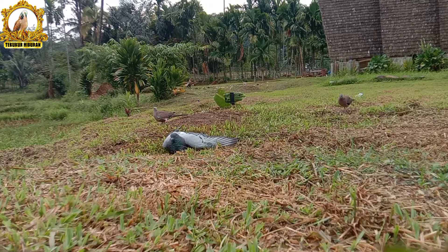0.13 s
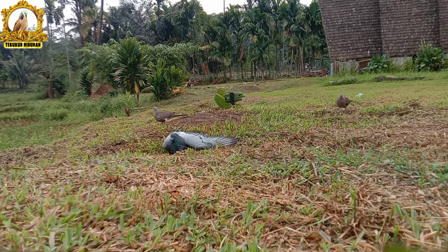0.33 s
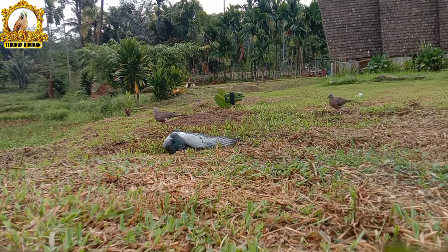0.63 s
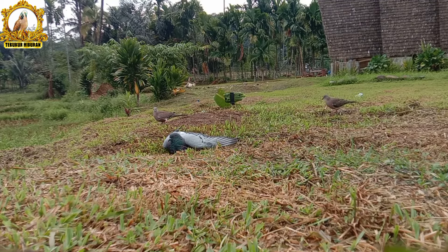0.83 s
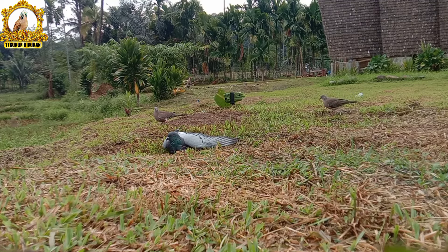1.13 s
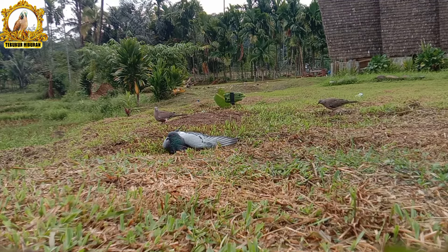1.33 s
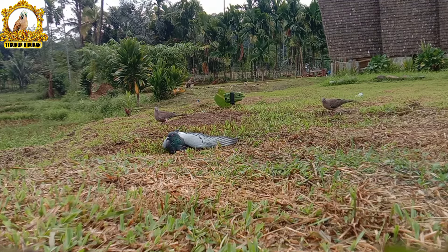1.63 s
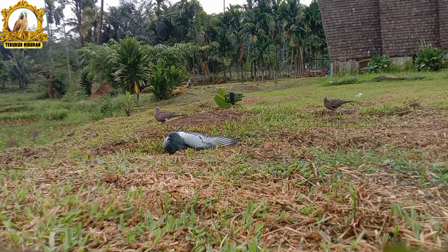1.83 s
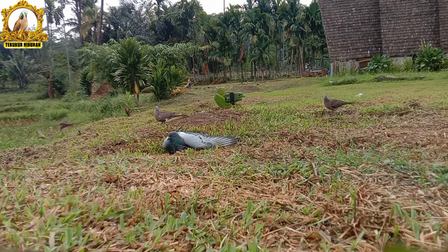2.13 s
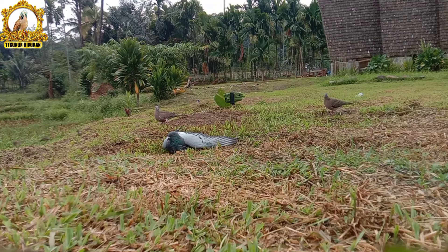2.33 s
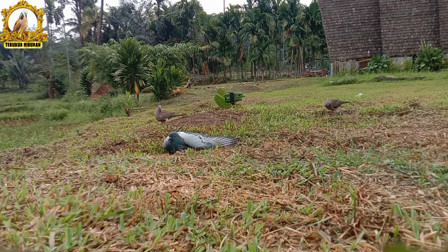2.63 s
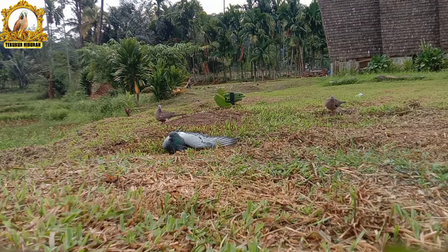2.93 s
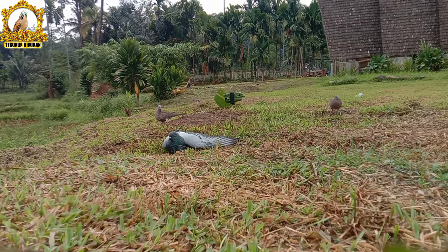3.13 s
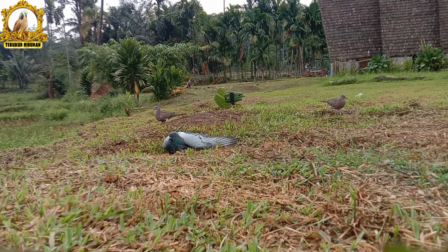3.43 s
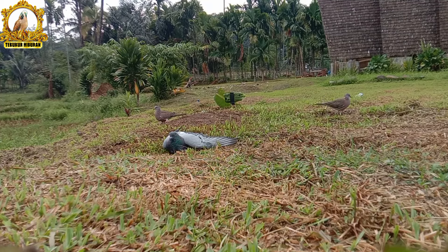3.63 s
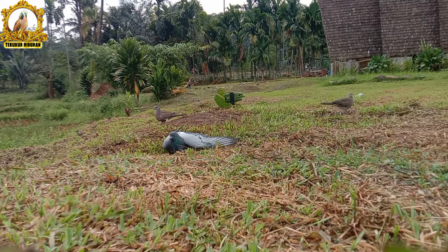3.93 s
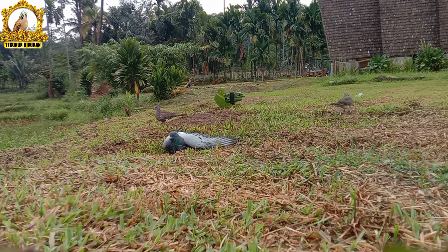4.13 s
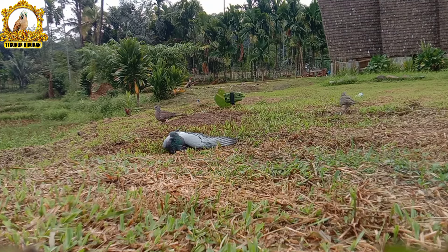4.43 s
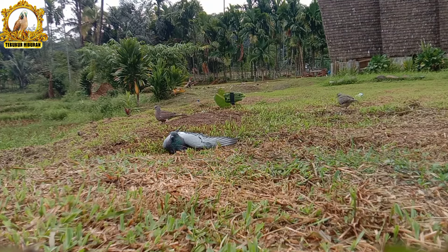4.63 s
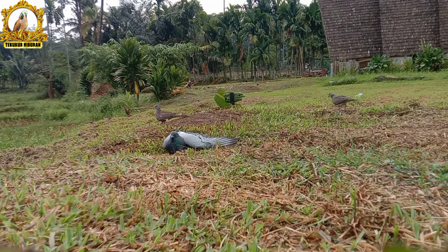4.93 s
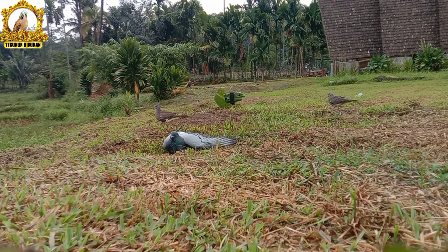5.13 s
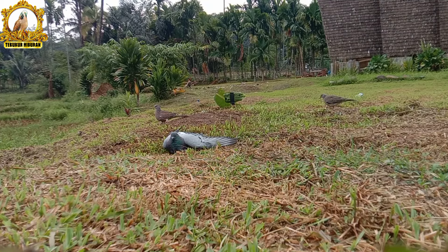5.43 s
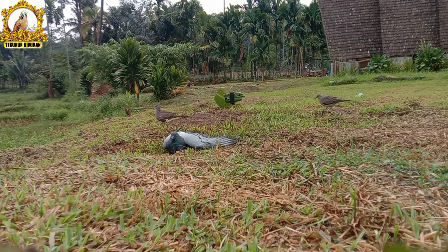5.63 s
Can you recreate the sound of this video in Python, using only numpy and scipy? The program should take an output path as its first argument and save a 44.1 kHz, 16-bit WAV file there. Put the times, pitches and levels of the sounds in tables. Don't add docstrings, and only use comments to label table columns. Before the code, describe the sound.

A quiet outdoor village yard, captured by a phone microphone near birds on the grass. A very short, bright sparrow chirrup strikes at 0 s, the loudest close sound. At about 0.5 s overlapping sparrows answer with a squabbling cluster and a tiny rising squeal; a weaker chirp follows near 1.2 s and another quick burst at 1.65 s. From 1.9 to 3.55 s a rooster across the yard crows once: two rough opening syllables, a long strained cry from 2.4 s, then a breaking, stuttering fall. Soft low wing thumps come irregularly, clearer from 2 to 4.4 s and bunched from 5.25 to 5.8 s. Small distant sparrow chirps continue throughout. A faint steady whistle appears around 3.2 s, and far fowl moan and cluck after 4.8 s. Underneath are breeze with low rumble, swelling near 3.5 s and at the end, faint insects, motor hum, distant flock chatter and short natural echoes.

```python
import sys
import numpy as np
from scipy import signal
from scipy.fft import rfft, irfft
from scipy.io import wavfile
from scipy.ndimage import uniform_filter1d

SR = 44100
rng = np.random.default_rng(int(sys.argv[2]) if len(sys.argv) > 2 else 0)


def linear_from_db(decibels):
    return 10 ** (np.asarray(decibels, float) / 20)


def master(y):
    cut = np.clip(np.atleast_2d(y).T, -1, 1)
    pcm = np.round(cut * 32767)
    wavfile.write(sys.argv[1], SR, pcm.astype(np.int16))


N = 255780

# (time of the flick [s], flick [dB], lead-in [dB],
# tail [dB], pitch share)
CHIRRUPS = [
    (-.008, -13, -61, -37, 0.94),
    (0.5368, -24, -38, -45, 0.97),
    (0.538, -25.5, -66, -60, 0.98),
    (1.171, -30, -38.5, -43.5, 0.96),
]
CLEAR_BLUR_HZ, TAIL_BLUR_HZ, HOARSE_BLUR_HZ, STROKE_BLUR_HZ = 46, 138, 600, 111


def rms_one(x):
    return x / np.sqrt(np.mean(np.abs(x) ** 2) + 1e-20)


def in_time(rows):
    s, *columns = np.transpose(rows)
    return [np.interp(np.arange(N) / SR, s, column) for column in columns]


def drift(rate_hz, size=N):
    r = np.exp(-2 * np.pi * rate_hz / SR)
    run_in = int(SR / rate_hz)
    noise = rng.standard_normal(size + run_in)
    return rms_one(signal.lfilter([1], [1, -2 * r, r * r], noise)[run_in:])


def resonance(x, hz, width_hz):
    r = np.exp(-np.pi * width_hz / SR)
    b = (1 - r * r) / 2 * np.array([1, 0, -1])
    a = [1, -2 * r * np.cos(2 * np.pi * hz / SR), r * r]
    return signal.lfilter(b, a, signal.lfilter(b, a, x))


def swaying(hz, spread_hz):
    sway = drift(spread_hz) + 1j * drift(spread_hz)
    return rms_one(np.real(sway * np.exp(2j * np.pi * np.cumsum(hz) / SR)))


def whistled(rows, flat, steady_hz):
    out = np.zeros(N + SR)
    for s, length, start_hz, end_hz, peak_db, blur_hz in rows:
        at, size = max(round(s * SR), 0), round(length * SR)
        u = np.arange(size) / size
        phase = 2 * np.pi * np.cumsum(start_hz + (end_hz - start_hz) * u) / SR
        blur_hz = max(blur_hz, 2)
        wander = drift(blur_hz, size) + 1j * drift(blur_hz, size)
        wander = rms_one(steady_hz / blur_hz + wander)
        swell = np.sin(np.pi * u) ** flat
        out[at:at + size] += linear_from_db(peak_db) * swell * np.real(np.exp(1j * phase) * wander)
    return out[:N]


def near_birds():
    # (time [s], length [s], start [Hz], end [Hz], peak [dB])
    squabble = [(.001, 0.013, 1554, 1190, -39.5), (0.009, 0.013, 3600, 4000, -32.5),
                (0.016, 0.011, 3740, 3530, -36), (.003, .009, 5150, 4800, -34),
                (.005, 0.01, 6150, 6100, -46), (0.02, .01, 6300, 6250, -51),
                (0.522, 0.022, 4600, 4450, -31.5), (0.556, .008, 3430, 3880, -33),
                (0.56, 0.011, 3900, 3600, -32.5), (0.523, 0.025, 5060, 4710, -25.5),
                (0.471, 0.0086, 5380, 5400, -49), (0.511, 0.013, 6270, 6050, -42.5),
                (.558, 0.013, 7600, 7220, -47), (0.55, 0.018, 2814, 2660, -34),
                (0.567, 0.0093, 2830, 2700, -40), (0.571, 0.0072, 6400, 6170, -47),
                (1.638, 0.0067, 6070, 5800, -50), (1.64, .007, 3600, 4050, -41.5),
                (1.643, 0.011, 5000, 4350, -47), (1.657, 0.0083, 4220, 4170, -43),
                (1.671, 0.0053, 3600, 3750, -39), (1.674, 0.005, 5080, 5030, -43),
                (1.686, 0.008, 3580, 3510, -39), (1.663, 0.0039, 4710, 5360, -26),
                (1.667, 0.0041, 5040, 4770, -31), (1.68, 0.0063, 3500, 3680, -30.5)]
    # (time [s], length [s], start [Hz], end [Hz], peak [dB])
    hoarse = [
        (0.0011, 0.044, 3600, 3380, -39),
        (.493, 0.0765, 4900, 5300, -41.5),
        (0.54, 0.0053, 5800, 4700, -37),
        (0.51, .065, 4906, 3770, -36.5),
    ]
    # (time [s], length [s], start [Hz], end [Hz], peak [dB])
    paired = [(1.692, .014, 3570, 3700, -40), (0.1, .008, 4980, 4800, -42), (0.106, 0.044, 3700, 3530, -49),
              (4.295, 0.021, 5360, 5000, -48), (4.947, 0.014, 4730, 5300, -50),
              (4.964, 0.024, 3690, 3600, -51), (2.491, 0.028, 5220, 4774, -44),
              (2.51, 0.027, 3600, 3500, -46), (3.3, 0.026, 5400, 5500, -46),
              (3.309, 0.023, 3810, 4040, -45), (3.596, 0.029, 5000, 5010, -44.5),
              (3.603, 0.026, 4500, 4390, -46.5), (3.613, 0.039, 3700, 3330, -42.5)]
    # (time after the flick [s], length [s], start [Hz], end [Hz])
    tail = (0.015, 0.0215, 3780, 3520)
    # (time [s], length [s], start [Hz], end [Hz])
    squeal = (.526, 0.038, 1012, 1700)
    # (multiple, level [dB], share of the squeal it lasts)
    squeal_orders = [(2, -37, 0.99), (3, -46, 0.51)]
    rows = [(*row, CLEAR_BLUR_HZ) for row in squabble]
    rows += [(*row, HOARSE_BLUR_HZ) for row in hoarse]
    rows += [(*row, TAIL_BLUR_HZ) for row in paired]
    rows += [(s + tail[0], *tail[1:], tail_db, TAIL_BLUR_HZ) for s, _, _, tail_db, _ in CHIRRUPS]
    s, length, start_hz, end_hz = squeal
    for k, db, part in squeal_orders:
        stop_hz = start_hz + part * (end_hz - start_hz)
        rows.append((s, part * length, k * start_hz, k * stop_hz, db, CLEAR_BLUR_HZ))
    return chirrups() + whistled(rows, flat=.9, steady_hz=200)


def chirrups():
    # (time from the flick [s], pitch [Hz], level [dB], share of the flick's own strength)
    glide = [
        (-.019, 4470, -23, 0),
        (-.015, 4600, -0.5, 0.13),
        (-.002, 4330, -8, 0.071),
        (.002, 4668, -3, 1),
        (.0045, 5396, -2.5, 1),
        (.007, 5276, 0, 1),
        (0.012, 4550, -3.5, 0.57),
        (0.016, 4300, -25, 1),
    ]
    out = np.zeros(N + SR)
    lag, hz, db, flick = np.transpose(glide)
    t = np.arange(lag[0], lag[-1], 1 / SR)
    for s, flick_db, lead_db, _, share in CHIRRUPS:
        shape_db = db + lead_db + np.clip(flick, 0, 1) * (flick_db - lead_db)
        level_db = np.interp(t, lag, shape_db) + 1.5 * drift(160, len(t))
        voice = linear_from_db(level_db) * np.sin(2 * np.pi * np.cumsum(share * np.interp(t, lag, hz)) / SR)
        out[SR // 2 + round((s + lag[0]) * SR):][:len(t)] += voice
    return out[SR // 2:][:N]


def leafy_strokes():
    # (time [s], length [s], start [Hz], end [Hz], peak [dB])
    strokes = [(0.526, .02, 2920, 3800, -45), (0.549, 0.035, 3290, 3000, -42),
               (0.574, .008, 3500, 4000, -42), (0.545, .011, 5150, 4900, -29),
               (0.596, 0.011, 3370, 3800, -51), (1.628, .007, 5650, 5700, -52),
               (1.634, 0.0074, 4950, 5000, -50), (1.648, .015, 5600, 5400, -50),
               (1.665, 0.0087, 4170, 3960, -40), (1.682, .03, 4700, 4750, -52),
               (1.685, 0.026, 5500, 5270, -55), (1.686, 0.0067, 3400, 3570, -35.5),
               (1.715, 0.014, 3520, 3600, -59), (4.875, .03, 3890, 3930, -56),
               (4.876, 0.022, 3990, 4740, -59), (4.879, 0.027, 3170, 3080, -60),
               (4.961, .014, 5600, 5500, -58), (4.977, .035, 4420, 4340, -58.5),
               (5.029, 0.022, 4900, 4900, -58), (5.045, 0.022, 3760, 3600, -57),
               (0.235, 0.032, 4900, 5050, -58.5), (0.269, 0.027, 4230, 4450, -61),
               (.1, .025, 4450, 4350, -54), (0.112, .008, 3660, 3640, -47), (0.622, 0.077, 5440, 5500, -61),
               (0.678, 0.044, 3300, 3520, -58)]
    return whistled([(*row, STROKE_BLUR_HZ) for row in strokes], flat=0.68, steady_hz=130)


def accents_and_overtones():
    # (time [s], length [s], start
    # [Hz], end [Hz], peak [dB])
    accents = [(3.076, .05, 6100, 6110, -56.5), (3.085, .055, 4550, 4480, -55),
               (3.135, 0.02, 5600, 5545, -56), (3.24, .05, 3880, 3820, -55), (3.44, 0.024, 5900, 5796, -55),
               (3.456, 0.023, 4430, 4430, -55), (3.485, .035, 3800, 3750, -57),
               (1.365, .017, 4450, 4350, -55), (1.488, .045, 5050, 4750, -53),
               (1.255, 0.052, 3700, 3800, -61), (3.815, 0.021, 5450, 5530, -52),
               (3.954, 0.02, 4480, 4520, -59), (4.538, .04, 5000, 5020, -65),
               (4.213, .035, 4900, 4900, -60), (4.315, 0.027, 4500, 4420, -56),
               (5.343, 0.048, 3000, 3070, -59)]
    # (time [s], length [s], start [Hz], end [Hz], peak [dB])
    overtones = [
        (.518, .034, 14500, 14930, -56),
        (.519, .024, 13200, 13000, -61),
        (.52, .024, 10060, 9700, -62),
        (0.541, .009, 10650, 10600, -52),
    ]
    rows = [(*row, STROKE_BLUR_HZ / 2) for row in accents]
    rows += [(*row, HOARSE_BLUR_HZ) for row in overtones]
    return whistled(rows, flat=0.56, steady_hz=100)


def crow():
    # (time [s], effort [dB], flapping rate [Hz], chaos [dB], beak opening [dB])
    syllables = [
        [(1.918, -56, 640, 1, -9), (1.971, -49, 680, -7, -13), (2.008, -51.5, 646.3, 10.5, -4.5),
         (2.06, -46.5, 629, 5, -11), (2.11, -53.5, 622, 2, -7), (2.181, -53.5, 640, -8, -3)],
        [(2.188, -54.5, 660, 15.5, -4), (2.23, -56, 670, 6.5, 0.5), (2.3, -56.5, 661, 0, 8),
         (2.33, -52, 661.5, 14.5, 2), (2.364, -53.5, 654.4, 4.5, -3)],
        [(2.41, -46, 669, 9, -8), (2.45, -54, 657, 0.5, 3), (2.56, -42.5, 649, 4, -3.5),
         (2.73, -46, 606.4, -2, -10.5), (2.8, -44, 645.2, 2.5, -9.5), (3.03, -49, 636.6, 9.5, -8.5),
         (3.1, -58.5, 647.2, 12.5, 1), (3.2, -57, 637, 4, -4)],
        [(3.27, -50.5, 654, -0.5, -8), (3.4, -49.5, 664, -7.5, -11.5), (3.5, -52, 665, -11, -10),
         (3.55, -59, 668, -6, 0)],
    ]
    # (time [s], pitch [Hz])
    chest = [
        (1.9, 570),
        (1.97, 630),
        (2.1, 580),
        (2.22, 640),
        (2.35, 600),
        (2.47, 700),
        (2.68, 690),
        (3.0, 565),
        (3.55, 525),
    ]
    rows = [row for part in syllables for row in part]
    onset = (rows[0][0] - .008, -85, *rows[0][2:])
    silence = (4.5, -99, 665.0, -31, 7)
    effort_db, flap_hz, chaos_db, open_db = in_time([onset, *rows, silence])
    late = np.arange(N) / SR - 3.285
    stutter_db = 6 * np.sin(2 * np.pi * 15.93 * late) * ((late > 0) & (late < .25))
    beak_db = effort_db + open_db
    upper_hz, first_db, second_db = upper_voice()
    throat_db = effort_db + chaos_db + stutter_db
    rasp = crow_rasp(second_db, throat_db, flap_hz, effort_db + stutter_db, in_time(chest)[0], beak_db)
    return rasp + crow_voices(upper_hz, first_db, second_db, beak_db)


def crow_voices(upper_hz, first_db, second_db, beak_db):
    # (multiple, level under the second [dB])
    upper_orders = [(3, -7), (7, -18.5), (8, -22.5)]
    # (multiple of upper voice, multiple of lower voice, level [dB])
    sum_tones = [(1, 1, 1.5), (1, 2, -0.5), (2, 1, -1)]
    # (from [s], to [s])
    locked = [
        (2.262, 2.325),
        (2.455, 2.52),
    ]
    # (from [s], to [s], times the usual wobble)
    frayed = (2.53, 2.73, 4.95)
    lower_hz, lower_db, sum_db = lower_voice()
    t = np.arange(N) / SR
    loose = np.where(np.any([(t > a) & (t < b) for a, b in locked], axis=0), .2, 1)
    fray = np.where((t > frayed[0]) & (t < frayed[1]), frayed[2], 1)
    upper = 2 * np.pi * np.cumsum(upper_hz * (1 + 0.00627 * fray * drift(43.0))) / SR
    lower = 2 * np.pi * np.cumsum(lower_hz * (1 + 0.03684 * loose * drift(50.4))) / SR
    out = linear_from_db(first_db) * np.sin(upper) + linear_from_db(second_db) * np.sin(2 * upper)
    out += linear_from_db(lower_db) * np.sin(lower)
    for k, db in upper_orders:
        if k == 3:
            passed_db, wander = -np.clip((upper_hz - 750) / 4.6, 0, 12), 0
        else:
            passed_db, wander = np.clip(beak_db + 62.0, -15, 0), 0.9 * drift(89)
        out += linear_from_db(second_db + db + passed_db + 2.6 * drift(29.4)) * np.sin(k * upper + wander)
    for k, m, db in sum_tones:
        out += linear_from_db(second_db + sum_db + db + 2.5 * drift(31)) * np.sin(k * upper + m * lower)
    out += linear_from_db(second_db + sum_db + beak_db + 49.0) * np.sin(3 * upper + lower)
    return np.sqrt(2) * out * linear_from_db(-1.0 + 0.69 * drift(46.4))


def upper_voice():
    # (time [s], length [s], top pitch [Hz], first partial [dB], second partial [dB])
    sung = [
        (1.921, 0.1, 768, -49.5, -42.5),
        (2.016, 0.072, 788, -51.5, -48),
        (2.203, .12, 813, -40, -42),
        (2.332, .06, 810.5, -47, -70),
        (2.41, 0.32, 804, -41.5, -44.5),
        (2.94, 0.2, 798, -42, -41),
        (3.131, 0.0623, 731, -52.5, -40.5),
        (3.204, 0.063, 740, -49, -41),
        (3.278, 0.063, 702, -55, -46.5),
    ]
    peak_share = [0.54, 0.2, 0.48, .3, 0.13, 0.91, 0.27, 1, 0.36]
    hz, first, second = np.full(N, 700.), np.zeros(N), np.zeros(N)
    for (s, length, top_hz, first_db, second_db), peak in zip(sung, peak_share):
        t = np.arange(round(length * SR)) / SR
        span = slice(round(s * SR), round(s * SR) + len(t))
        scoop = .12 * np.clip(1 - t / min(.06, length / 2), 0, 1) ** 2
        drop = .06 * np.clip(1 - (length - t) / .035, 0, 1) ** 2
        hz[span] = top_hz * (1 - scoop - drop) - 200 * t
        late = t - peak * length
        shape_db = np.where(late < 0, 81 * late, -39 * late)
        shape_db = shape_db - 2 * np.clip(1 - np.minimum(t, length - t) / 0.015, 0, 1)
        first[span], second[span] = linear_from_db(first_db + shape_db), linear_from_db(second_db + shape_db)

    def smooth_db(x):
        return 20 * np.log10(uniform_filter1d(x, size=200).clip(0) + 1e-5)

    return uniform_filter1d(hz, size=200), smooth_db(first), smooth_db(second)


def lower_voice():
    # (time [s], length [s], pitch [Hz], level [dB], sum tones with the upper voice [dB])
    bursts = [(1.913, 0.047, 571.7, -52, -25), (2.024, 0.077, 592, -48.5, -6.5),
              (2.202, 0.051, 650, -44, -33), (2.266, .1, 520, -57.5, -5), (2.391, 0.054, 621.6, -44.5, -23),
              (2.462, .11, 520, -55, -3), (2.577, 0.32, 592, -51.5, 2), (2.93, 0.11, 563.7, -45.5, -26),
              (3.181, 0.067, 550, -39.5, -34), (3.299, 0.072, 556, -35, -8.5),
              (3.383, 0.035, 533, -37.5, -11), (3.462, .065, 528, -49.5, -37)]
    gap_db = 15
    rows = []
    for s, length, hz, db, sum_db in bursts:
        rise, fall = 0.21 * min(length, .1), 0.31 * min(length, .1)
        rows += [(s, hz, db - gap_db, sum_db), (s + rise, hz, db, sum_db),
                 (s + length - fall, hz, db, sum_db), (s + length, hz, db - gap_db, sum_db)]
    hz, db, sum_db = in_time(sorted(rows))
    t = np.arange(N) / SR
    db = np.where((t > rows[0][0]) & (t < rows[-1][0]), db, -99)
    return uniform_filter1d(hz, size=900), db, uniform_filter1d(sum_db, size=900)


def crow_rasp(second_db, level_db, flap_hz, chest_db, chest_hz, beak_db):
    # (multiple of flapping rate, spread [Hz], level [dB])
    throat_bands = [(2, 90, 2), (3, 93, 4.5), (3.5, 128, -5), (4.0, 124, -6.5), (2.3, 78, -8)]
    # (centre [Hz], width [Hz], level [dB])
    beak_bands = [(2854, 234, 5), (2480, 780, -8), (3600, 79, 0.5), (1095, 1160, 0)]
    # (centre [Hz], width [Hz], level [dB])
    sizzle_bands = [(4600, 110, -2.5), (5500, 260, -1), (5900, 98, -6), (6840, 680, -9.5)]
    throat = rms_one(sum(linear_from_db(db) * swaying(k * flap_hz, spread_hz) for k, spread_hz, db in throat_bands))
    breath = rng.standard_normal(N)
    beak = rms_one(sum(linear_from_db(db) * resonance(breath, hz, width) for hz, width, db in beak_bands))
    sizzle = rms_one(sum(linear_from_db(db + 2.6 * drift(13.7)) * resonance(breath, hz, width)
                         for hz, width, db in sizzle_bands))
    sizzle = sizzle * (linear_from_db(second_db - 21.5) + linear_from_db(beak_db - 9.0))
    chest = linear_from_db(chest_db) * swaying(chest_hz, spread_hz=64.6)
    rasp = linear_from_db(level_db) * throat + chest + linear_from_db(beak_db) * beak + sizzle
    return rasp * linear_from_db(.7 * drift(120))


def crow_barks():
    # (time [s], length [s], start [Hz], end [Hz], peak [dB])
    catches = [(1.909, 0.04, 2116, 2020, -47.5), (1.916, 0.054, 1346, 1377, -44),
               (2.003, 0.017, 2260, 1860, -40), (2.011, 0.038, 1337, 1276, -41),
               (2.046, 0.055, 1810, 1720, -49), (2.048, 0.042, 600, 579, -44),
               (2.183, 0.022, 1990, 1930, -41), (2.194, 0.045, 2854, 3110, -49),
               (2.269, 0.044, 2930, 2870, -48), (2.359, 0.088, 2960, 2950, -51),
               (2.42, .035, 3000, 3200, -52), (2.459, 0.055, 1290, 1285, -39.5),
               (2.208, 0.056, 2270, 2420, -51), (2.32, 0.026, 2000, 1950, -46),
               (2.39, 0.043, 2050, 2000, -48), (2.5, 0.074, 2000, 1960, -43),
               (2.539, 0.042, 2900, 2880, -44), (2.6, 0.054, 1875, 1880, -43), (2.6, .04, 2880, 2860, -48),
               (2.799, 0.078, 1950, 1937, -44), (2.981, .06, 1947, 1890, -45),
               (3.129, 0.0655, 2078, 2174, -46), (3.152, .04, 1810, 1751, -49),
               (3.215, 0.046, 2198, 2120, -43.5), (3.21, 0.053, 1849, 1784, -45),
               (3.262, 0.021, 1266, 1250, -43), (3.292, 0.018, 2030, 1940, -41),
               (3.29, .035, 1250, 1348, -44.5), (3.348, .02, 2000, 2030, -43),
               (3.344, .045, 1303, 1260, -42), (3.415, 0.02, 1256, 1299, -44.5),
               (3.467, 0.052, 1273, 1262, -50.5)]
    return whistled([(*row, 45.4) for row in catches], flat=0.5, steady_hz=60)


def wings():
    # (time [s], peak [dB], pitch [Hz])
    beats = [(0.522, -41, 125), (1.999, -41.5, 210), (2.398, -35.5, 100.1), (2.993, -36, 109.2),
             (3.07, -35, 152), (3.5, -32.5, 153.8), (4.098, -40, 125), (4.227, -39, 148),
             (5.256, -38.5, 145), (5.313, -35.5, 161), (5.364, -37, 160), (5.517, -38.5, 150),
             (5.697, -39, 161), (5.784, -36, 158),
             (0.581, -43, 170), (0.889, -46.5, 153), (1.214, -43, 138), (1.26, -43, 170), (1.76, -42, 91.5),
            (1.971, -36, 106), (2.549, -45, 64.6), (2.68, -38, 153.4), (2.766, -42.5, 152.7),
            (3.397, -40, 151.2), (3.579, -42, 83.7), (3.912, -46, 221), (4.323, -46.5, 83.4),
            (4.437, -40.5, 137), (4.637, -46.5, 126)]
    out, t = np.zeros(N + SR), np.arange(SR // 8) / SR
    shape = 2 * (1 - np.exp(-t / 0.0036)) * np.exp(-t / 0.013)
    for s, peak_db, hz in beats:
        out[round(s * SR):][:len(t)] += linear_from_db(peak_db - 3.5) * shape * np.sin(2 * np.pi * hz * t)
    return out[:N]


def far_birds():
    stair = [
        (1.0, 0.041, 1.5),
        (.89, 0.65, 2),
        (.78, 1.1, 2),
    ]
    # (time [s], top pitch [Hz], step [s], level [dB], stressed note 0-2
    far_chirps = [(0.059, 5860, 0.024, -57, 1.5), (0.829, 5520, 0.012, -54, -4),
                  (1.125, 6200, 0.021, -59.5, 1.5), (1.22, 5600, 0.02, -55, 0.5),
                  (1.339, 5500, 0.017, -57, 1), (1.476, 5530, 0.016, -64, 1.2),
                  (2.129, 5500, 0.013, -54.5, 1.5), (2.263, 5750, 0.011, -59, -4),
                  (2.54, 5610, 0.013, -49.5, 3), (2.929, 5550, 0.033, -50, -0.6),
                  (3.325, 5570, 0.0087, -52.5, 1.2), (3.438, 5856, .018, -55, 3),
                  (3.818, 5580, 0.018, -53, 1.5), (3.942, 5790, 0.019, -59, 2),
                  (4.222, 5520, 0.019, -55, 0), (4.514, 5760, 0.019, -65, -0.5),
                  (4.653, 5650, 0.021, -60.5, -1), (4.93, 5240, 0.013, -63, 0), (5.08, 5670, 0.022, -59, 0),
                  (5.53, 5640, 0.02, -58, -0.5), (5.685, 5750, 0.027, -63, 0)]
    # (time [s], length [s], start [Hz], end [Hz], peak [dB])
    peeps = [
        (0.657, 0.1, 3750, 4110, -59),
        (0.757, 0.073, 3910, 3470, -63),
        (5.008, 0.028, 3697, 3650, -55.5),
        (2.245, 0.088, 3820, 3760, -57),
    ]
    rows = [(*row, 60) for row in peeps]
    for s, hz, step, db, stress in far_chirps:
        over = max(-stress, 0)
        for k, (share, lag, length) in enumerate(stair):
            weak_db = 2.5 * (abs(k - stress) - over)
            top_hz, end_hz = share * hz, share * hz * (1 - 0.0307)
            rows.append((s + lag * step, length * step, top_hz, end_hz, db - weak_db * (1 + over), 174))
    return whistled(rows, flat=0.29, steady_hz=170)


def far_tones():
    # (time [s], length [s], start [Hz], end [Hz], peak [dB])
    whistle = [
        (3.151, 0.314, 938, 937, -58),
        (3.745, 0.81, 934, 940, -73.5),
    ]
    # (time [s], length [s], start [Hz], end [Hz], peak [dB])
    fowl = [
        (4.95, 0.505, 590, 640, -60),
        (5.56, 0.307, 640, 690, -57.5),
        (5.6, 0.31, 860, 810, -57.5),
        (5.26, 0.12, 390, 410, -53),
        (4.8, 0.41, 240, 520, -68),
        (0.0142, 0.037, 330, 293, -47),
    ]
    rows = [(*row, 2.0) for row in whistle] + [(*row, 40.2) for row in fowl]
    return whistled(rows, flat=0.29, steady_hz=7.0)


def chatter():
    s, pitch, length, weak = rng.random((170, 4)).T
    hz = 1700 * 2.4 ** pitch
    rows = np.transpose([s * N / SR, 0.048 * (.5 + length), hz, hz, -66 - 6.3 * weak, 0 * s + 30])
    return whistled(rows, flat=.5, steady_hz=30)


def yard_air():
    # (pitch [Hz], level [dB per Hz])
    colour = [(30, -37), (60, -3), (150, -0.5), (260, -8), (450, -12), (800, -23), (1500, -25), (2900, -21),
              (4000, -22), (6250, -35), (7300, -63), (9000, -36), (15000, -38)]
    # (time [s], yard level [dB], top band level [dB])
    strength = [
        (0, -58.5, -76.5),
        (.35, -61.5, -84),
        (.8, -56.5, -78.5),
        (1.4, -60, -78.5),
        (2.0, -56.5, -80),
        (3.5, -53, -76.5),
        (4.0, -58.5, -80),
        (5.0, -59.5, -80.5),
        (5.8, -52, -76),
    ]
    # (centre [Hz], width [Hz], level [dB], throb [per s])
    hum_bands = [(1236, 96, -70.5, 8.6), (6880, 550, -77.5, 6.4), (3720, 170, -77.5, 4)]
    yard_db, top_db = in_time(strength)
    colour_hz, colour_db = np.transpose(colour)
    edges = 25 * 2 ** np.arange(0, 9.4, 1 / 3)
    white, gust, flutter = rng.standard_normal((2, N)), drift(3.03), drift(8.4)
    air = 0
    for k, (a, b) in enumerate(zip(edges, edges[1:])):
        hz = np.sqrt(a * b)
        band = signal.sosfilt(signal.butter(2, [a, b], "band", fs=SR, output="sos"), white[k % 2])
        level_db = np.interp(np.log(hz), np.log(colour_hz), colour_db)
        lumps_db = 2.8 if hz < 350 else 1.4 if hz < 4000 else .6
        flicker_db = lumps_db * (0.8 * gust + drift(9.0))
        flicker_db = flicker_db + flutter * (.5 * (hz > 7500) + 2 * (hz < 120))
        follow_db = yard_db - yard_db.mean() if hz < 500 else top_db - top_db.mean()
        follow_db = follow_db * (.6 if 500 < hz < 7500 else 1)
        air = air + band * linear_from_db(level_db + flicker_db + follow_db)
    hums = sum(linear_from_db(db + 2.95 * drift(throb)) * rms_one(resonance(white[0], hz, width))
               for hz, width, db, throb in hum_bands)
    return linear_from_db(-52.0) * rms_one(air) + hums


def scatter(x, t60):
    t = np.arange(SR // 2) / SR
    tail = rng.standard_normal(len(t)) * linear_from_db(-60 * t / t60) * (t > .006)
    return signal.fftconvolve(x, tail / np.sqrt(np.sum(tail ** 2)))[:N]


def scene():
    near, far, rooster = near_birds(), far_birds(), crow()
    hoarse = crow_barks() + leafy_strokes()
    echoes = linear_from_db(-14) * scatter(near, t60=.2) + linear_from_db(-4) * scatter(far, t60=.3)
    echoes += linear_from_db(-13) * scatter(rooster, t60=.4) + linear_from_db(-9) * scatter(hoarse, t60=0.26)
    birds = near + far + rooster + hoarse + accents_and_overtones() + echoes
    background = wings() + far_tones() + yard_air() + chatter()
    return (birds + background)[None]


def top_cut(x):
    return signal.sosfilt(signal.butter(12, 15500, fs=SR, output="sos"), x)


def record(dry):
    # (pitch [Hz], gain [dB])
    response = [(7300, 0), (7900, -7), (8500, -2.5), (10900, -2), (11400, -11.5), (13900, -11),
                (14500, -6.5), (15400, -6.5), (15800, -60)]
    dry = signal.sosfilt(signal.butter(2, 45, "high", fs=SR, output="sos"), dry)
    power = uniform_filter1d(dry ** 2, size=500)
    hiss = rng.standard_normal(dry.shape) * (linear_from_db(-45) * np.sqrt(power) + linear_from_db(-7) * power)
    bend = 0.39 * dry ** 2 + 3.5 * dry ** 3 + hiss
    bend = signal.sosfilt(signal.butter(4, 8200, "high", fs=SR, output="sos"), bend)
    colour = linear_from_db(np.interp(np.fft.rfftfreq(N + SR, 1 / SR), *np.transpose(response)))
    spectrum = rfft(dry, N + SR) * colour + rfft(bend, N + SR) * np.sqrt(colour)
    heard = irfft(spectrum, N + SR)[:, :N]
    return top_cut(heard)


dry = scene()
out = record(dry)
master(out)
```